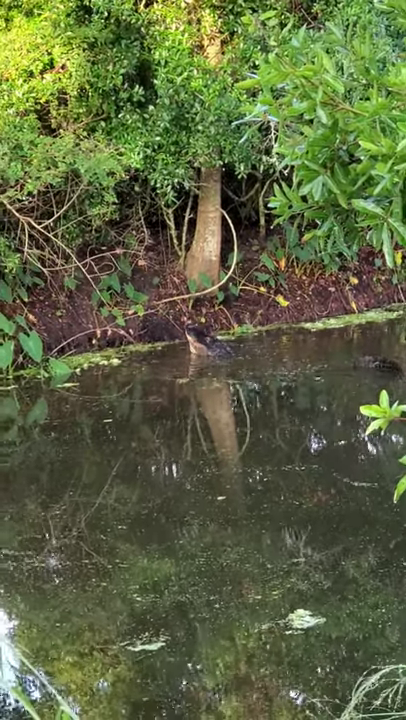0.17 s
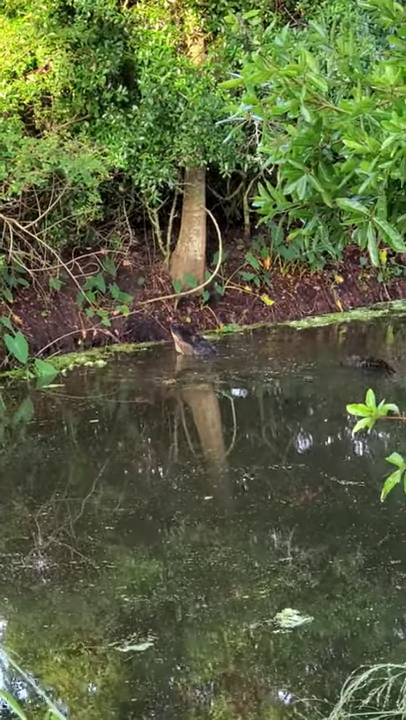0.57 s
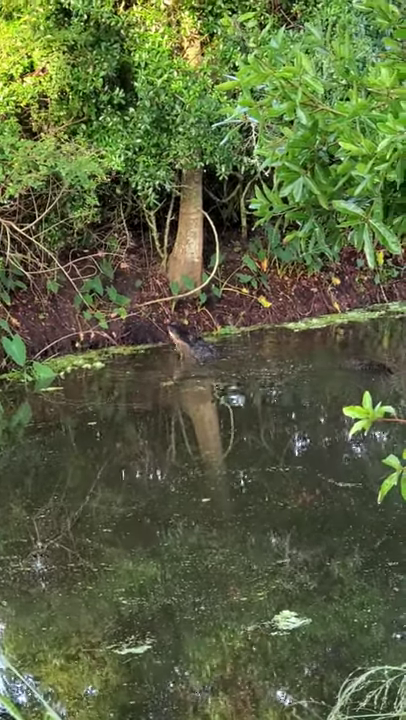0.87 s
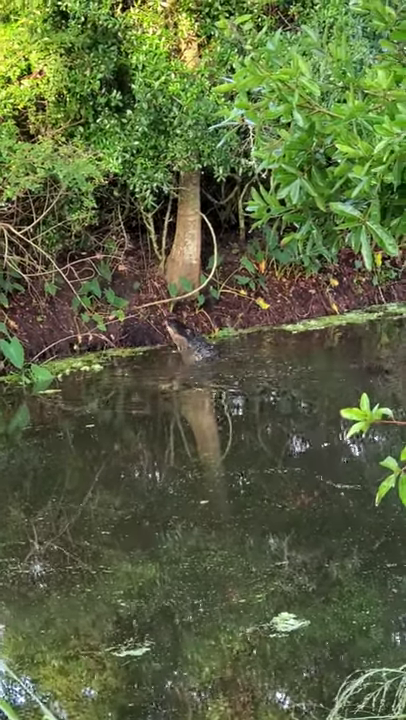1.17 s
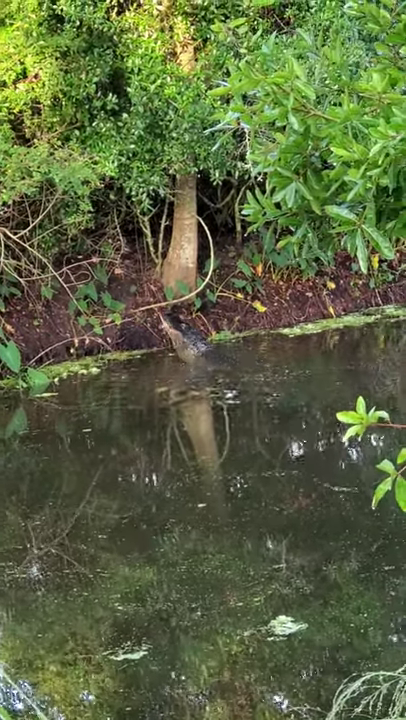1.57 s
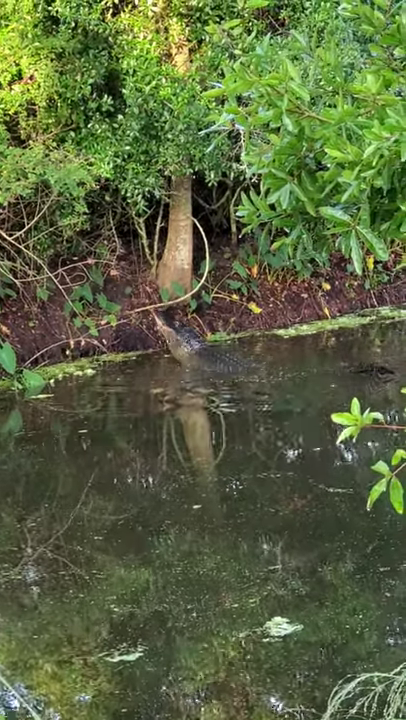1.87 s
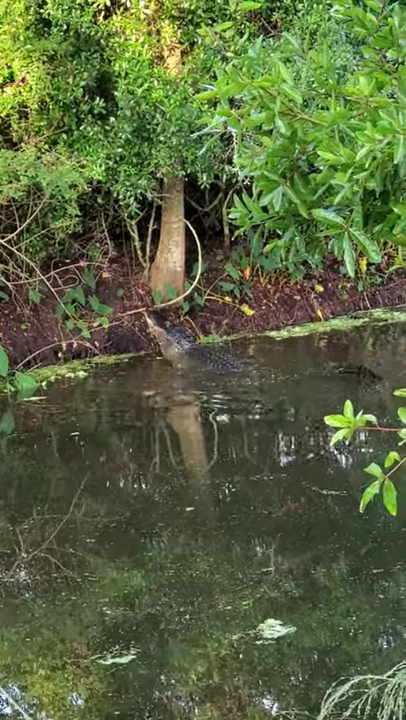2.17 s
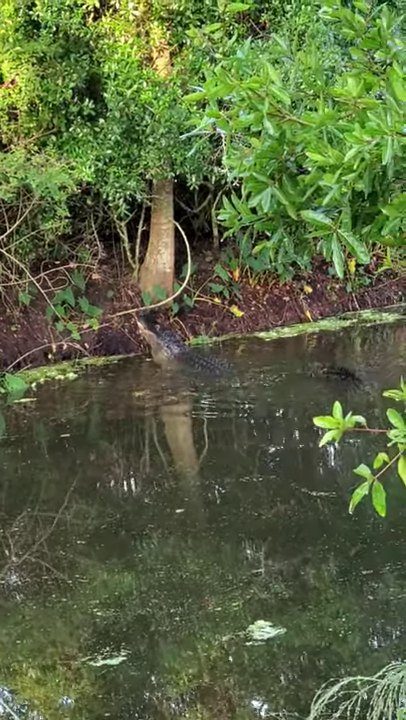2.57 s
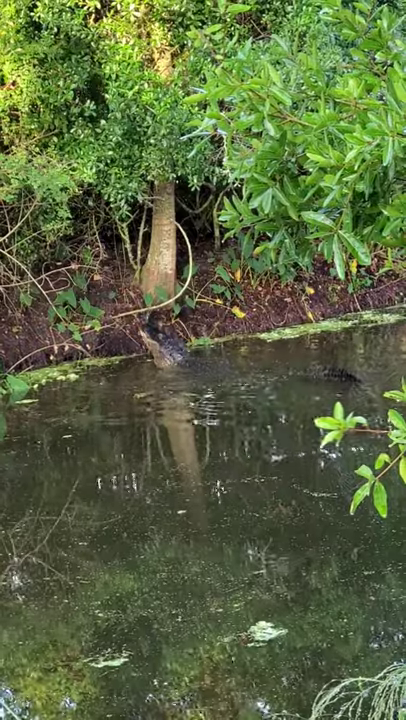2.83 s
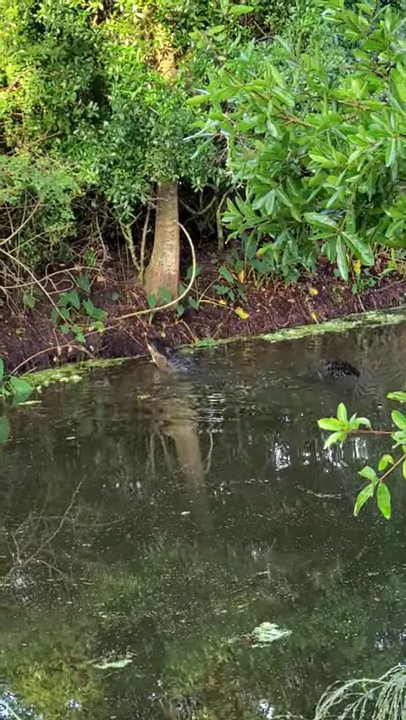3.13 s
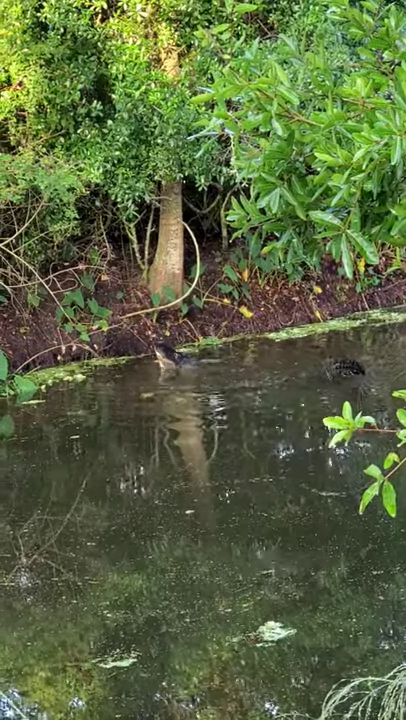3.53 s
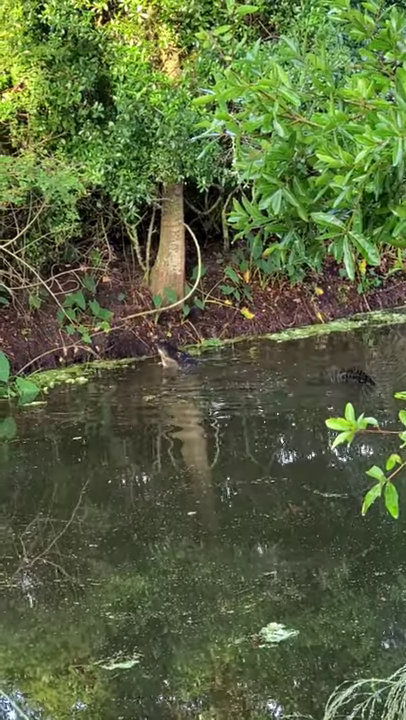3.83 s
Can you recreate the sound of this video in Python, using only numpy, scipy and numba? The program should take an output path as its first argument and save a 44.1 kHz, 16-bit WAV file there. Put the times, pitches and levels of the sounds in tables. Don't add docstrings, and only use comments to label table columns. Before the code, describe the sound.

An alligator bellows in deep pulsing rumbles, the second splashing water, amid trilling crickets.

```python
import sys
import numpy as np
from scipy import signal
from scipy.fft import rfft, irfft
from scipy.io import wavfile
from scipy.ndimage import uniform_filter1d
from numba import njit

SR = 44100
rng = np.random.default_rng(int(sys.argv[2]) if len(sys.argv) > 2 else 0)


def gain_from_db(level_db):
    decades = np.asarray(level_db, float) / 20
    return 10 ** decades


def materialize(psi):
    bounded = np.clip(np.atleast_2d(psi).T, -1, 1)
    quanta = np.round(bounded * 32767).astype(np.int16)
    wavfile.write(sys.argv[1], SR, quanta)


N = 176400
t = np.arange(N) / SR


def level(x, db):
    return x * gain_from_db(db) / np.sqrt(np.mean(x ** 2))


def col(table, k, at=t):
    x, y = np.array(table, float)[:, [0, k]].T
    return np.interp(at, x, y)


@njit
def moving_band(x, hz, width):
    y, band_state, low_state = np.empty(len(x)), 0., 0.
    for i in range(len(x)):
        g = np.tan(np.pi * hz[i] / SR)
        k = width[i] / hz[i]
        v = (band_state + g * (x[i] + 1e-18 - low_state)) / (1 + g * (g + k))
        band_state = 2 * v - band_state
        low_state += 2 * g * v
        y[i] = k * v
    return y


def band(x, hz, width, count=1):
    for _ in range(count):
        x = moving_band(x, hz + 0 * t, width + 0 * t)
    return x


def resonate(x, hz, width, count):
    return band(x, hz, width, count) * np.sqrt(SR / width)


def walk(rate):
    k = int(SR / rate)
    steps = np.repeat(rng.standard_normal(N // k + 1), k)
    return 1.8 * uniform_filter1d(uniform_filter1d(steps, k), k)[:N]


def colour(x, table):
    hz = np.fft.rfftfreq(N, 1 / SR) + 1
    f, db = np.array(table, float).T
    return irfft(rfft(x) * gain_from_db(np.interp(np.log(hz), np.log(f), db, -70, -70)), N)


def gate(a, b, edge=0.0062):
    return np.clip(np.minimum(t - a, b - t) / edge, 0, 1)


def place(x, pan_db, lag=0):
    return np.array([np.roll(x, lag) * gain_from_db(pan_db / 2), x * gain_from_db(-pan_db / 2)])


def echo(x, trees, db):
    return signal.fftconvolve(x[None], trees * gain_from_db(db) / 30, axes=1)[:, :N]


# f/Hz, level/dB
SIDE_SPREAD = [(60, -19.5), (300, -16.5), (1000, -2), (4000, 2.5), (14000, -4)]


def bed(table, db, swell_db, flicker_db, pan_db):
    out = 0
    side_hz, side_db = np.array(SIDE_SPREAD).T
    for hz in 30 * 2 ** np.arange(9.):
        mid = band(rng.standard_normal(N), hz, hz * 0.92)
        side = band(rng.standard_normal(N), hz, hz * 0.92)
        wide = gain_from_db(np.interp(np.log(hz), np.log(side_hz), side_db))
        movement = gain_from_db(swell_db * walk(2.71) + flicker_db * walk(14))
        out = out + movement * np.array([mid + wide * side, mid - wide * side])
    return level(colour(out, table), db) * gain_from_db(np.array([[pan_db], [-pan_db]]) / 2)


# f/Hz, level/dB
RUMBLE = [(25, 6), (55, 3), (120, -1.5), (250, -17.5), (600, -19.5), (1500, -26), (2300, -30.5),
          (3800, -38)]
# f/Hz, level/dB
CHORUS = [(3600, -22), (4600, 1.5), (5300, 4), (6000, 6.5), (7200, -2), (8400, -1.5), (9200, -101)]
# f/Hz, level/dB
HIGH = [(9300, -17), (10500, -6.5), (12000, 1.5), (14000, -1.5), (14600, 0)]


def backdrop():
    rumble = bed(RUMBLE, -45.5, swell_db=0.61, flicker_db=2.07, pan_db=-0.015)
    chorus = bed(CHORUS, -48.5, swell_db=0.56, flicker_db=0.67, pan_db=0.64)
    hiss = bed(HIGH, -58, swell_db=0.64, flicker_db=0.33, pan_db=-1.8)
    return rumble + chorus + hiss


# f/Hz, level/dB
OPENING = [(22, -13), (29.5, -7), (31.5, -4.5), (36, -2), (43, 1), (50, -7.5)]


def fold_pulses(rate, phase, effort):
    lead_s, jitter_s, scatter, open_phase = .005, .00015, 0.45, .68
    luck, cycle = rng.standard_normal((60, 4)), np.arange(60)
    pulses = np.zeros((2, N))
    for k, shift in enumerate((0, open_phase)):
        due = np.interp(cycle + shift, phase, t, -1, 9)
        at = due - lead_s + jitter_s * col(effort, 5).mean() * luck[:, k]
        at_rate = col(rate, 1, at)
        db = col(effort, 1, at) + k * col(OPENING, 1, at_rate)
        db = db + col(effort, 5, at) * scatter * luck[:, 2 + k]
        strength = gain_from_db(db) * np.sqrt(SR / at_rate)
        ok = (at > rate[0][0]) & (at < rate[-1][0])
        pulses[k, (at[ok] * SR).astype(int)] = strength[ok]
    return pulses


# t/s, extra level/dB
SNAPS = [(3.052, 2), (3.133, 7), (3.168, 6.5), (3.225, 7), (3.281, 8), (3.341, 8), (3.466, 6.5),
         (3.557, 7.5), (3.606, 6), (3.735, 4), (3.763, 2)]
# t/s, level/dB
BELLY_SWELL = [(.8, -7.5), (2.8, 9), (3.1, 1.5), (3.55, -0.5), (3.66, 4.5), (4, 5)]


def tract(shut, opening, rasp, rate, phase, effort):
    snap_db = sum(db * gate(s - .014, s + .004, .001) for s, db in SNAPS)
    boom = shut * gain_from_db(snap_db) + rasp
    chest_hz = col(effort, 2)
    swaying_hz = chest_hz * (1 + 0.035 * np.sin(2 * np.pi * (phase - 0.024)))
    chest = resonate(boom, swaying_hz, 176 * (chest_hz / 235) ** 1.1, count=4)
    open_chest = resonate(opening, chest_hz, 239 * chest_hz / 235, count=4)
    sweep_hz = 58.6 * (30 / col(rate, 1)) ** 1.2
    throat_hz = 477.7 + sweep_hz * np.sin(2 * np.pi * (phase - .95))
    throat = resonate(shut + opening + rasp, throat_hz, 125.4, count=4)
    early = np.roll(boom + opening, -260)
    belly = resonate(early, 132.6, 103, count=3)
    return chest + open_chest - gain_from_db(-14 + col(effort, 3)) * throat + gain_from_db(-12 + col(BELLY_SWELL, 1)) * belly


# f/Hz, width/Hz, level/dB
SNOUT = [(1230, 48, -0.5), (1478, 105, -10), (1787, 42, -2.5), (1921, 77, -1.5), (2409, 37, -10.5),
         (2600, 57, -8), (2735, 60, -10.5), (3060, 45, -9.5), (3262, 66, -10.5), (3493, 120, -13.5),
         (3835, 79, -11)]
# t/s, pitch factor
SNOUT_STRETCH = [(3.05, .93), (3.2, .95), (3.4, .98), (3.7, 1.01)]


def snout(puff, shut, phase):
    stretch = np.where(t > 3, col(SNOUT_STRETCH, 1), 1)
    breath = puff * (1 + .5 * np.cos(2 * np.pi * phase)) + 0.47 * shut
    out = 0
    for hz, width, db in SNOUT:
        loudness = gain_from_db(db + 2.06 * walk(30))
        out = out + loudness * resonate(breath, hz * stretch * (1 + 0.0098 * walk(10)), width, count=2)
    return out


def flank_hum(phase, effort, t0, t1):
    turn = 2 * np.pi * (phase - 0.12)
    shake = np.cos(turn) + gain_from_db(-3.5) * np.cos(2 * turn - .3)
    return shake * gain_from_db(col(effort, 1) + col(effort, 4)) * gate(t0, t1 + 0.0048, 0.0011)


def growl(rate, start, effort):
    t0, t1 = rate[0][0], rate[-1][0]
    phase = start + np.cumsum(col(rate, 1) * (t >= t0)) / SR
    shut, opening = fold_pulses(rate, phase, effort)
    air = rng.standard_normal(N) * gain_from_db(col(effort, 1)) * gate(t0, t1, 0.0012)
    puff = air * (1 + 0.39 * np.cos(2 * np.pi * (phase - .1)))
    rasp = gain_from_db(-23.5 + 2 * col(effort, 5)) * puff
    body = tract(shut, opening, rasp, rate, phase, effort)
    breath = gain_from_db(-42 + 2.62 * col(effort, 5)) * snout(puff, shut, phase)
    return body + breath + flank_hum(phase, effort, t0, t1)


# t/s, f/Hz
FIRST_RATE = [(0, 30.69), (.15, 31.86), (.35, 31.2), (.5, 30.06), (.65, 27.25), (.83, 22.47)]
# t/s, f/Hz
LEAD_IN_RATE = [(2.81, 25), (2.92, 32.5), (3.04, 25)]
# t/s, f/Hz
SECOND_RATE = [(3.04, 47.86), (3.12, 54.09), (3.22, 54.1), (3.35, 49.15), (3.5, 45.38), (3.62, 39.44),
               (3.74, 35.9), (3.86, 31.2), (4, 30)]
START_CYCLES = [.16, .63, .265]
# t/s, level/dB, chest f/Hz, throat level/dB, flank hum level/dB, unevenness/dB
FIRST_EFFORT = [(0, -20, 233, 2, -5, 0.5), (.3, -20, 231.7, 2.5, -7, 0.5), (0.551, -20, 217, 0.5, -9, -1.5),
                (.7, -24, 210, -0.5, -14, 0.5), (.78, -27.5, 207, 0, -14, -0.5),
                (.81, -39.5, 206, -1, -20, 6.5), (.83, -55, 198, -2, -7.5, 2)]
# t/s, level/dB, chest f/Hz, throat level/dB, flank hum level/dB, unevenness/dB
LEAD_IN_EFFORT = [(2.811, -51.5, 156, 3, 6, 10.7), (2.86, -40, 156, -6, 7.6, 2.2),
                  (2.95, -44, 179, -9, 7, 0.9), (3.04, -38, 174, 5, 3.7, 3)]
# t/s, level/dB, chest f/Hz, throat level/dB, flank hum level/dB, unevenness/dB
SECOND_EFFORT = [(3.04, -23, 210, 10, -23, 3.32), (3.056, -16.5, 182, -8.5, -2.5, 0.51),
                 (3.111, -22, 188, 5, 2, 2.6), (3.133, -18, 162, -1, 0, 3),
                 (3.302, -23.5, 178.6, 10, 4, 4.85), (3.451, -23.5, 171, 6.5, 1, 4.6),
                 (3.601, -25.5, 179.5, 9, -1.5, 4.6), (3.751, -20.5, 218, -0.5, -9, 3.1),
                 (4, -18.5, 210, 1.5, -7.5, 0.38)]


def alligator():
    first, lead_in, second = START_CYCLES
    return (growl(FIRST_RATE, first, FIRST_EFFORT)
            + growl(LEAD_IN_RATE, lead_in, LEAD_IN_EFFORT)
            + growl(SECOND_RATE, second, SECOND_EFFORT))


def cricket(trills, hz, rate, duty, spread_hz):
    out = 0
    for a, b, db in trills:
        beat = ((t - a) * rate) % 1
        stroke = np.sin(np.pi * np.clip(beat / duty, 0, 1))
        loudness = gain_from_db(db + 1.3 * walk(31)) * gate(a, b, 0.0033)
        wing_hz = hz * (1 - 0.052 * (beat - .3)) + spread_hz * walk(11.0)
        out = out + stroke * loudness * np.sin(2 * np.pi * np.cumsum(wing_hz) / SR)
    return out


# start t/s, end t/s, level/dB
TRILLS = [
    (.362, .455, -46),
    (.461, .92, -44),
    (1.241, 1.76, -42),
    (2.19, 3.0, -42.5),
    (3.55, 4.1, -43),
]
# start t/s, end t/s,
# level/dB
SECOND_WING = [
    (.7, .92, -44.5),
    (1.458, 1.76, -44),
    (2.335, 3.0, -45),
]
# start t/s, end t/s, level/dB
FAR_TRILLS = [
    (1.25, 1.57, -58),
    (1.75, 2.3, -57),
    (3.3, 4, -56),
]


def crickets():
    near = cricket(TRILLS, 5470, rate=40.5, duty=0.61, spread_hz=10)
    second_wing = cricket(SECOND_WING, 5630, rate=40.5, duty=0.73, spread_hz=15)
    far = cricket(FAR_TRILLS, 5950, rate=41.63, duty=0.82, spread_hz=98)
    return place(near + second_wing, -8.0, lag=3) + place(far, 2, lag=-1)


# start t/s, length t/s, level/dB, f/Hz, fall/share of pitch
CAWS = [
    (0.581, 0.22, -45.5, 316.6, 0.041),
    (1.253, 0.34, -57, 326.4, 0.047),
    (1.565, 0.3, -56, 317.5, 0.078),
    (2.032, 0.27, -56.5, 334, 0.16),
    (2.504, .21, -54, 317.4, 0.0915),
    (2.812, 0.2, -50, 314.5, 0.035),
    (2.955, 0.205, -50, 325.8, 0.024),
]


def caws():
    out = 0
    for s, length, db, hz, fall in CAWS:
        progress = ((t - s) / length).clip(0, 1)
        pitch = hz * (1 - fall * progress ** 2 + 0.0067 * walk(40))
        turn = 2 * np.pi * np.cumsum(pitch) / SR
        voice = sum(np.sin(k * turn) * gain_from_db(2.9 * walk(35.52)) for k in range(3, 8))
        voice = voice + band(rng.standard_normal(N), 1460, 620) * 4
        out = out + gain_from_db(db + 1.5) * gate(s, s + length, 0.049) * band(voice, 1588, 437, count=2)
    return out


# t/s, peak level/dB
KATYDID = [
    (0.6943, -31),
    (1.3793, -31),
    (1.919, -31.5),
    (2.4613, -27.5),
    (2.9577, -32),
    (3.6721, -28.5),
]


def katydid():
    teeth = np.zeros(N)
    for s, db in KATYDID:
        u = t - s
        shape = np.exp(-((u - .0015) / 0.0042) ** 2) + gain_from_db(-15.5) * gate(s, s + 0.042, 0.0055)
        teeth += gain_from_db(db) * shape * (np.cos(2 * np.pi * 720 * u) > .6)
    return gain_from_db(6.5) * band(teeth * rng.standard_normal(N), 13300, 3700, count=2)


def bubble(hz, db, ring_s, glide):
    u = np.arange(int(ring_s * SR)) / SR
    tone = np.sin(2 * np.pi * hz * u * (1 + glide * u / ring_s))
    fade = np.exp(-np.log(1000) * u / ring_s) * np.minimum(u / 0.0012, 1)
    return gain_from_db(db) * tone * fade


# t/s, level/dB
DANCE = [(3.03, -66), (3.08, -39), (3.2, -42), (3.32, -43), (3.42, -43.5), (3.52, -41.5), (3.68, -42.5),
         (3.85, -50.5), (4, -51.5)]
# f/Hz, level/dB
SPRAY = [(600, 8), (1500, -12), (3000, -8), (6500, 0.5), (9000, -10), (12000, 0.5), (14600, -2)]
# t/s, f/Hz, peak level/dB, ring t/s
PLOPS = [(.792, 2300, -43.5, 0.066), (.838, 560, -34.5, .13), (2.235, 590, -45, .08),
         (3.081, 1780, -34, 0.066), (3.19, 2720, -35, .04), (3.274, 1760, -34, 0.047),
         (3.31, 1720, -29.5, 0.078), (3.315, 3260, -34, 0.056), (3.334, 2370, -33, .06),
         (3.396, 1220, -37, 0.043), (3.455, 1100, -37, .04), (3.5, 3260, -41, 0.31), (3.64, 850, -42, .03),
         (3.668, 900, -39, .03), (3.695, 880, -39, 0.052), (3.759, 2700, -42, 0.037),
         (3.761, 2400, -37, 0.046)]


def water():
    drops = np.zeros((2, N + SR))
    for when, size, luck, side in rng.random((310, 4)):
        hz = 1100 * 7 ** size
        x = bubble(hz, 5 * np.log(luck + 1e-3) - 4 * size, 40 / hz, glide=0.033)
        i = int((3.4 + when) * SR)
        drops[:, i:i + len(x)] += x * gain_from_db(np.array([[1], [-1]]) * 3.1 * (side - 3.5))
    spray = bed(SPRAY, 0, swell_db=.5, flicker_db=1.5, pan_db=-1) + gain_from_db(3) * drops[:, :N]
    plops = np.zeros(N + SR)
    for s, hz, db, ring_s in PLOPS:
        x = bubble(hz, db, ring_s, glide=0.053)
        plops[int(s * SR):int(s * SR) + len(x)] += x
    return spray * gain_from_db(col(DANCE, 1)) + place(plops[:N], -2.1)


# start t/s, level/dB, from f/Hz, to f/Hz, glide t/s, hold t/s
WHISTLES = [
    (0.996, -63.5, 3000, 2560, .11, .01),
    (1.228, -59, 2280, 2860, .13, 0.12),
    (1.807, -53, 1696, 2810, .155, 0.12),
]


def whistles():
    out = 0
    for s, db, from_hz, to_hz, glide, hold in WHISTLES:
        hz = np.interp(t, [s, s + glide], [from_hz, to_hz]) + 30 * walk(45)
        loudness = gain_from_db(db + 2.7 * walk(35.05)) * gate(s, s + glide + hold)
        out = out + loudness * np.sin(2 * np.pi * np.cumsum(hz) / SR)
    return out


def chirr():
    return gain_from_db(-55) * gate(2.25, 2.4, 0.041) * band(rng.standard_normal(N), 2850, 1200, count=2) * 5


def scene():
    trees = rng.standard_normal((2, SR // 4)) * np.exp(-np.log(1000) * t[:SR // 4] / 1.3)
    gator = alligator()
    birds = caws() + whistles() + chirr()
    near = place(gator, -.8) + crickets() + place(katydid(), -12.5, lag=-1) + water()
    far = place(birds, -2, lag=-4) + backdrop()
    return near + far + echo(gator, trees, -24) + echo(birds, trees, -14)


def top_cut(x):
    return signal.sosfilt(signal.butter(12, 14990, fs=SR, output="sos"), x)


def record(dry):
    thin_bass = signal.butter(2, 46, "high", fs=SR, output="sos")
    mix = signal.sosfilt(thin_bass, dry)
    return top_cut(mix)


dry = scene()
out = record(dry)
materialize(out)
```